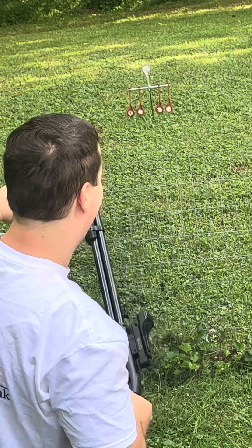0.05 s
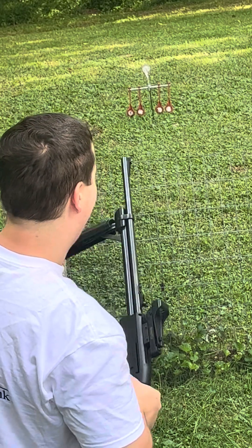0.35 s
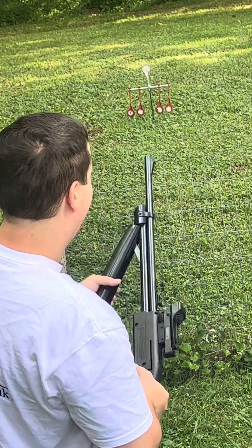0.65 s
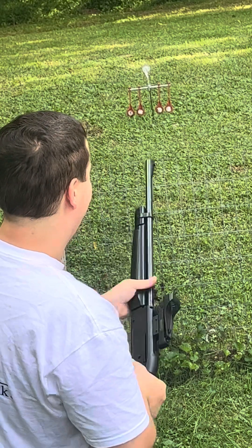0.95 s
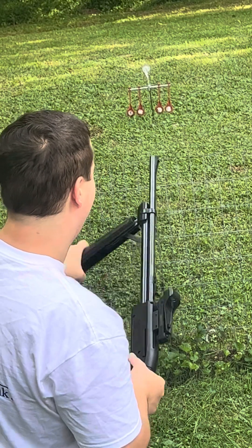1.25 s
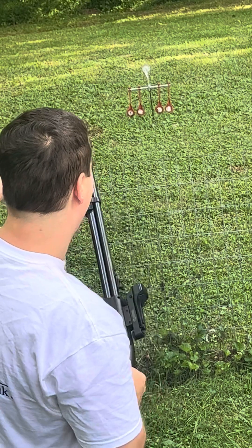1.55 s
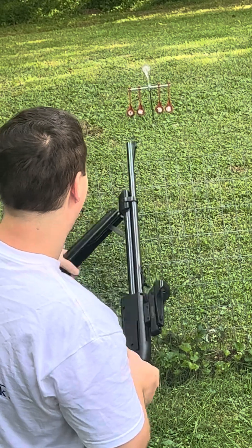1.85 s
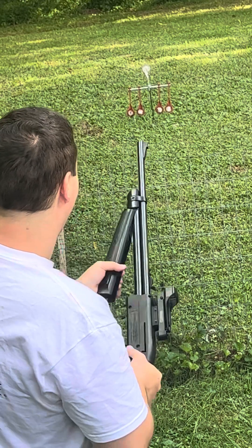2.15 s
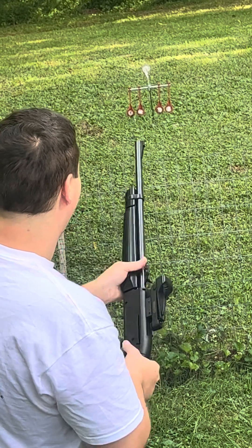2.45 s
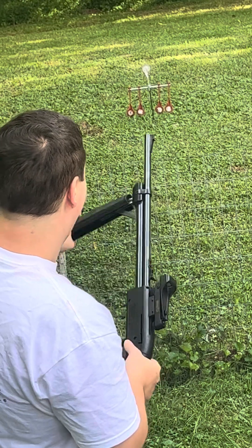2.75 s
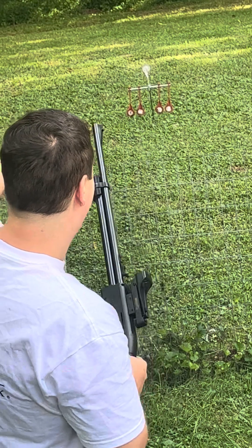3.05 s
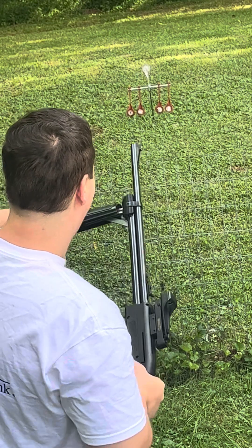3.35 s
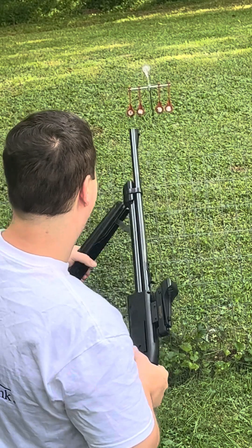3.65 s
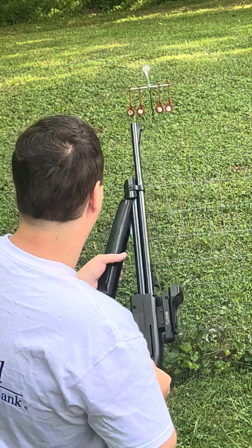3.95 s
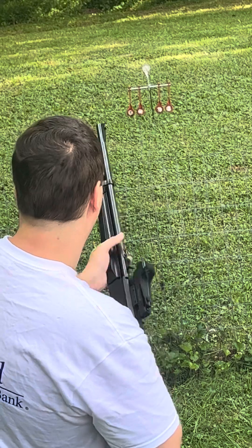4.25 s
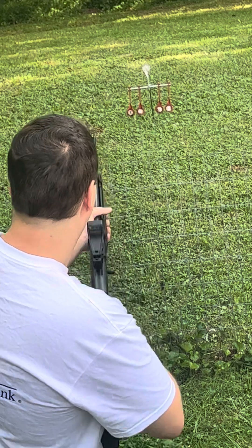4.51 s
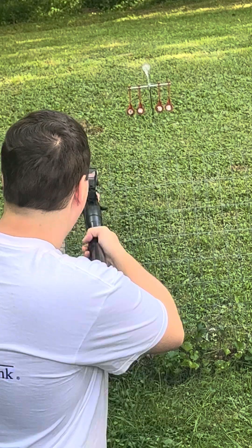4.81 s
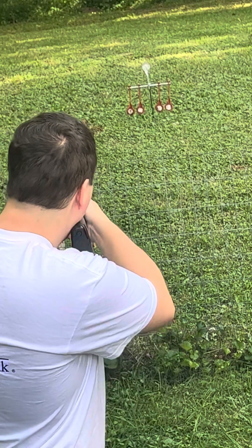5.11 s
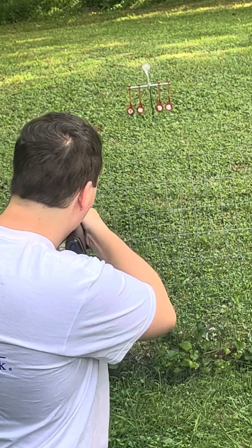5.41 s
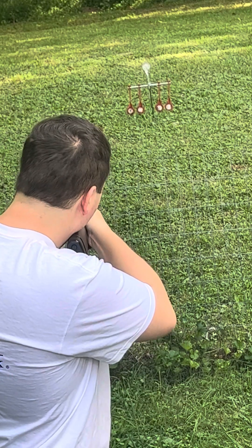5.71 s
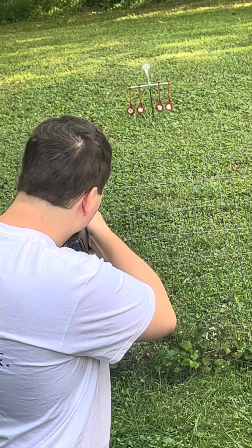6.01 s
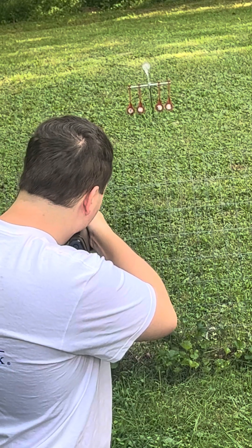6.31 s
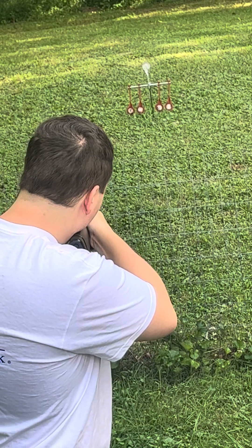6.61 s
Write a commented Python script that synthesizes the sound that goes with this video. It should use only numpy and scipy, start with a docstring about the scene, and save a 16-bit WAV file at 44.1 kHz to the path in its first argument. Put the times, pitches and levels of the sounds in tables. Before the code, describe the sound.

Three loud clacks of an air rifle's pump lever closing, with softer clicks between, on a quiet lawn with insects.

```python
"""On a summer lawn, an arm's length from a hand-held phone, a multi-pump air rifle is pumped three times.
The lever clicks open, the piston slides and draws air, and the fore-end slaps shut, ringing the tube.
A near wall and far trees answer; insects and two crickets sing over distant traffic and a machine.
Right at the microphone a breeze buffets, a sleeve rustles and the hand bumps softly."""
import sys
import numpy as np
from scipy import signal
from scipy.fft import rfft, irfft, next_fast_len
from scipy.io import wavfile
from scipy.ndimage import uniform_filter1d

SR = 44100
rng = np.random.default_rng(int(sys.argv[2]) if len(sys.argv) > 2 else 0)


def bounce(signal):
    """Save signal as a 16-bit WAV file at the path given by the first command-line argument."""
    frames = np.transpose(np.atleast_2d(signal))
    limited = np.clip(frames, -1, 1)
    pcm = np.round(limited * 32767).astype(np.int16)
    wavfile.write(sys.argv[1], SR, pcm)


N = 298556
T = np.arange(N) / SR

# far background: (time [s], air [dB], lower insects [dB], upper insects and whine [dB])
GARDEN_LEVELS = [(0, -56.5, -55.5, -59.5), (1.5, -54.5, -56, -58.5), (3, -57, -55.5, -59),
                 (4.6, -59, -57, -58), (5.4, -60, -60, -58.5), (6.77, -60, -63.5, -60)]
# far air and traffic: (frequency [Hz], level [dB])
FAR_AIR_SPECTRUM = [(30, -48), (70, -22.5), (120, 6), (400, -2), (700, 0), (1200, -3.5), (2500, -14),
                    (5000, -20), (9000, -39.5), (10500, -26.5), (14200, -28.5), (16000, -34)]
# a distant machine: (frequency [Hz], level [dB])
HUM_TONES = [(118, -75.5), (240, -65.5), (1060, -79), (1290, -71.5)]
# insect choruses and, last, a thin whine: (centre [Hz], width [Hz], relative level [dB])
HIGH_BANDS = [(3700, 740, -11), (4490, 480, -13), (5720, 1770, -4.5), (6560, 700, -5.5), (7220, 860, -4.5),
              (9040, 240, -15)]
# a faint, thin 9 kHz whine fades in, grows and cuts off near the end: (time [s], gain [dB])
WHINE_SWELL = [(0, -36), (1.1, -11), (1.7, 0.5), (4.3, 1.5), (4.7, 5), (6.37, 7.5), (6.55, -21)]
# two crickets: (time [s], lower pitch [Hz], upper pitch [Hz], lower level [dB], upper level [dB])
CRICKET_SONGS = [(0, 3820, 4230, -79, -75), (4.3, 3684, 4200, -78, -75), (4.65, 3690, 4145, -83, -70.5),
                 (5.05, 3600, 4240, -88, -71.5), (5.25, 3620, 4240, -74, -75), (5.5, 3780, 4240, -78, -78),
                 (6.1, 3830, 4200, -80, -82), (6.77, 3770, 4180, -97.5, -84.5)]
# the breeze drops halfway and returns at the end: (time [s], relative level [dB])
BREEZE_LEVELS = [(0.0, -67), (0.14, -52.5), (0.87, -51), (0.95, -58), (1.0, -43), (1.27, -54),
                 (2.15, -50.5), (2.17, -46), (2.93, -48.5), (3.1, -53), (3.35, -70), (3.96, -85),
                 (4.35, -65), (4.75, -61), (5.21, -83), (5.97, -75), (6.53, -51), (6.77, -55)]
# wind on the microphone: (frequency [Hz], level [dB])
WIND_SPECTRUM = [(20, -31.5), (40, -11), (65, 0), (120, 2.5), (200, -6), (300, -22.5), (700, -69)]
# sleeve and grip, close up: (time [s], level [dB])
RUSTLE_LEVELS = [(0, -59.5), (.3, -53.5), (2.45, -60), (2.94, -53), (3.24, -56.5), (4.4, -55.5),
                 (4.58, -54.5), (4.73, -56.5), (4.97, -62.5), (6.77, -58.5)]
# rubbing cloth: (frequency [Hz], level [dB])
CLOTH_SPECTRUM = [(30, -58), (75, -25), (130, -4.5), (230, 1.5), (330, -8.5), (520, -6), (900, -22.5),
                  (3000, -42)]
# barrel, pump tube and plastic fore-end: (frequency [Hz], level [dB], t60 [s])
RIFLE_MODES = [(373.5, -11, 0.061), (480, -14, .04), (681, -3, 0.046), (960, -4.5, 0.054),
               (1051, -8.5, 0.073), (1363, -1.5, 0.083), (1479, -12, 0.11), (1819, 0, 0.037),
               (2110, -4.5, 0.032), (2467, -2, 0.025), (2996, -1.5, 0.025), (3260, 0, 0.025),
               (3644, 1.5, 0.028), (4450, -10, 0.019), (5150, -1, 0.033), (6740, -11, 0.025),
               (10920, -2, 0.021)]
# the crack of contact: (frequency [Hz], level [dB])
CRACK_SPECTRUM = [(200, -10.5), (480, -4.5), (820, -9), (2000, -1.5), (3100, 3), (4100, -0.5), (5200, 3),
                  (6000, -5), (7500, -5.5), (9000, -1.5), (11500, 0.5), (14500, -1.5), (16000, -4)]
# the rifle's crowded higher modes: (frequency [Hz], level [dB])
CROWD_SPECTRUM = [(150, -11.5), (500, -15), (780, -15), (1050, -6), (1700, 1), (2300, -4), (3700, -13.5),
                  (5200, -11.5), (6500, -12), (12000, -12), (16000, -34.5)]
# the linkage knocks against its open stop: (time [s], level [dB])
STOP_KNOCKS = [(0.055, -58), (1.5405, -45.5), (2.9661, -45.5), (3.174, -53)]
# small linkage ticks, and the latch's low thump just before the third slap:
# (time [s], level [dB], low edge [Hz], high edge [Hz])
TICKS_AND_THUMP = [(.209, -58.5, 4000, 14800), (0.346, -50, 1500, 4000), (0.381, -43.5, 1610, 4080),
                   (.388, -46, 1595, 3970), (0.657, -48.5, 1740, 12700), (1.1084, -41, 1200, 4000),
                   (1.114, -34.5, 1400, 6460), (1.756, -59, 1510, 3960), (1.787, -47, 1500, 4040),
                   (2.157, -49.5, 2500, 14100), (2.9754, -44.5, 1600, 3760), (3.1912, -46, 1530, 4070),
                   (3.4983, -43, 1600, 14900), (3.515, -47, 1600, 5000), (3.5305, -44, 1480, 5000),
                   (4.0689, -26.5, 300, 1720)]
# the fore-end slaps shut:
# (time [s], level [dB], latch lead [s], tube note [Hz], relative latch [dB], relative crack [dB])
SLAPS = [(0.775, -11, 0.0077, 5130, -13, 2.5), (2.237, -10.5, 0.0077, 5150, -10.5, 3),
         (4.0776, -10, 0.0095, 4870, -19, 1)]
# the lever snaps out of its catch: (time [s], level [dB], catch lead [s], lever note [Hz])
LEVER_SNAPS = [(1.0416, -26, .0416, 1670), (2.5304, -24.5, .0336, 1765)]
# the piston is pushed back down its tube: (middle [s], level [dB])
PISTON_PUSHES = [(.365, -53), (1.789, -50.5), (3.539, -50.5)]
# the sliding piston: (frequency [Hz], level [dB])
SLIDE_SPECTRUM = [(300, -16.5), (650, -0.5), (1100, -7.5), (1750, -4), (2700, -4.5), (3700, -4),
                  (5500, -10.5), (8500, -14), (14000, -16), (16000, -33.5)]
# near wall and lawn edge: (delay [s], level [dB], t60 [s], tilt [dB/octave])
NEAR_ECHOES = [(0.0219, -17.5, .05, -3), (0.096, -39.5, .15, -6.5)]
# scatter from lawn and trees: (low edge [Hz], requested high edge [Hz], level [dB], t60 [s])
TREE_SCATTER = [(913, 1400, -16.5, 0.2), (301, 240, -21, 0.235), (1000, 1760, -20.5, 1),
                (2200, 5300, -22, .7), (3010, 8300, -23, 1), (10000, 12200, -23, 0.38)]
# a rush of pump air, then two faint rubs: (middle [s], level [dB], low edge [Hz], high edge [Hz])
SOFT_RASPS = [(.745, -48.5, 1140, 2100), (4.997, -58.5, 2880, 4000), (5.32, -62, 3700, 4730)]
# the valve's whistle: (pitch [ratio], level [dB])
WHISTLE_PARTIALS = [(0.999, -0.5), (1.748, -13.5), (2.45, -17.5), (6.298, -13.5)]
# the hand bumps the phone: (time [s], level [dB], pitch [Hz])
HAND_BUMPS = [(1.005, -35, 120), (1.179, -34, 122), (2.964, -26.5, 66), (2.981, -32, 94),
              (3.045, -28.5, 184), (3.161, -35, 199), (3.683, -32, 250), (4.345, -39, 240),
              (4.504, -35.5, 378), (4.54, -37, 259), (4.59, -40, 130), (4.632, -38.5, 256),
              (4.684, -38.5, 267), (4.752, -47, 226), (4.811, -27.5, 162), (4.856, -36.5, 238),
              (4.896, -38, 240), (4.925, -43, 228), (5.099, -37.5, 161), (5.132, -35, 148),
              (5.158, -33.5, 189), (5.556, -41.5, 140.3), (6.46, -34.5, 114)]
# sleeve and stock shift against the hand: (middle [s], half length [s], level [dB])
GRIP_SHIFTS = [(3.657, 0.23, -47.5), (4.55, .1, -44), (4.849, .1, -49.5), (5.198, 0.12, -51)]
# the two microphone ports: (frequency [Hz], left's phase lead [rad])
PORT_PHASE = [(20, 0), (350, -.15), (550, .4), (950, .6), (1250, 1.7), (1450, 2.9), (1580, 2.5),
              (1760, .35), (3000, .3), (5200, .05), (5700, -.75), (7100, -1.2), (8300, -3.1), (11000, -5.3),
              (15000, -9.3)]
# the close rifle at the ports: (frequency [Hz], left minus right [dB])
NEAR_BALANCE = [(250, -2.5), (600, 5), (800, 0), (1100, 9.5), (1380, -3.5), (1650, -10.5), (2100, -3),
                (3300, 0.5)]
# the far garden at the ports: (frequency [Hz], left minus right [dB])
FAR_BALANCE = [(600, 1), (900, 2), (1150, 0.5), (1450, -11), (1850, -7.5), (2300, -1), (3000, -0.5)]

# kinds of contact: (low edge [Hz], high edge [Hz], relative crack [dB], crack t60 [s])
CATCH = (990, 25000, 5, 0.007)
SNAP = (1360, 11400, 1.5, 0.017)
KNOCK = (1554, 4300, -2, -4.3)  # negative t60: the crack holds on as a short hiss
LATCH = (1200, 4600, 3.7, 0.01)
GRAZE = (4000, 30000, 5.8, 0.015)
REBOUND_S = 0.0099  # the linkage knocks a second time
SIDE = np.array([[1], [-1]])  # opposite signs left and right


def undb(db):
    """Decibels to gain."""
    return 10 ** (np.asarray(db) / 20)


def unit(x):
    """Scale to rms 1."""
    return x / np.sqrt(np.mean(x ** 2))


def unit_energy(x):
    """Scale to a sum of squares of 1."""
    return x / np.sqrt(np.sum(x ** 2))


def fade(t, t60):
    """Exponential decay that starts at t = 0."""
    return (t >= 0) * np.exp(-np.log(1000) * np.maximum(t, 0) / t60)


def swell(t, half_s):
    """Bell-shaped rise and fall around t = 0."""
    return np.exp(-.5 * (t / half_s) ** 2)


def bins(n):
    """Frequencies of a spectrum of n samples."""
    return np.maximum(np.fft.rfftfreq(n, 1 / SR), 1)


def along(points, hz):
    """Read (frequency [Hz], value) points on a log-frequency axis."""
    f, value = np.transpose(points)
    return np.interp(np.log(hz), np.log(f), value)


def curves(rows):
    """The columns of a time table, one value a sample."""
    s, *columns = np.transpose(rows)
    return [np.interp(T, s, c) for c in columns]


def bandpass(x, low_hz, high_hz):
    """Band-pass; the high edge is held between 1.2 times the low edge and 20 kHz."""
    edges = [low_hz, np.clip(high_hz, low_hz * 1.2, 20000)]
    return signal.sosfilt(signal.butter(2, edges, "band", fs=SR, output="sos"), x)


def colour(x, points, tilt_db=0):
    """Give x a spectrum, tilted per octave; rms 1."""
    n = next_fast_len(len(x))
    hz = bins(n)
    gain = undb(along(points, hz) + tilt_db * np.log2(hz))
    return unit(irfft(rfft(x, n) * gain, n)[:len(x)])


def noise(points, n=N):
    """Coloured noise of rms 1."""
    return colour(rng.standard_normal(n), points)


def wide(points, side_db):
    """Coloured noise that partly differs between left and right."""
    return unit(noise(points) + undb(side_db) * noise(points) * SIDE)


def walk(rate, n=N):
    """Random drift with a spread near 1, turning rate times a second."""
    k = int(SR / rate)
    steps = np.repeat(rng.standard_normal(n // k + 1), k)
    return np.sqrt(2) * uniform_filter1d(steps, k)[:n]


def sine(hz):
    """A sine that follows a moving pitch."""
    return np.sin(2 * np.pi * np.cumsum(hz) / SR)


def add(track, s, x):
    """Mix x into the track at time s."""
    i = max(int(s * SR), 0)
    track[i:i + len(x)] += x[:N - i]


def far_air_and_hum(drift_hz=1.504):
    """Far off, a wash of air and traffic and a machine whose hum drifts in pitch."""
    air = wide(FAR_AIR_SPECTRUM, side_db=-10.5) * undb(curves(GARDEN_LEVELS)[0] + 0.99 * walk(5))
    hum = sum(undb(db) * np.sqrt(2) * sine(hz + drift_hz * walk(5.4)) for hz, db in HUM_TONES)
    return air + hum


def insects_and_whine(throb_db=0.3, spacing_hz=35, uneven_db=4.5):
    """Choruses of narrow lines, each insect on its own pitch, and a faint, thin whine above them."""
    bands = 0
    _, lower_db, upper_db = curves(GARDEN_LEVELS)
    for k, (hz, width, db) in enumerate(HIGH_BANDS):
        band = [(hz / 2, -50), (hz - width, -12), (hz - width / 2, -3), (hz, 0),
                (hz + width / 2, -3), (hz + width, -16), (hz + 2 * width, -40), (hz * 2, -70)]
        level_db = lower_db if k < len(HIGH_BANDS) / 2 else upper_db
        whine_db = curves(WHINE_SWELL)[0] if k == len(HIGH_BANDS) - 1 else 0
        bands += wide(band, side_db=-15) * undb(db + level_db + whine_db + throb_db * walk(25))
    n = next_fast_len(N)
    lines = np.interp(bins(n) / spacing_hz, np.arange(SR // 20), rng.standard_normal(SR // 20))
    lined = irfft(rfft(bands, n) * undb(uneven_db * lines), n)[:, :N]
    return unit(lined) * np.sqrt(np.mean(bands ** 2))


def crickets(flutter_db=4, waver_hz=55, rate=420, chirp_s=5.095, chirp_hz=3520, glide_hz_per_s=-900):
    """Two single crickets with wavering, fluttering notes, and one far falling chirp."""
    low_hz, high_hz, low_db, high_db = curves(CRICKET_SONGS)
    songs = sum(undb(db + flutter_db * walk(rate)) * sine(hz + waver_hz * walk(rate))
                for hz, db in [(low_hz, low_db), (high_hz, high_db)])
    t = T - chirp_s
    chirp = undb(-73) * swell(t, 0.02) * np.sin(2 * np.pi * (chirp_hz + glide_hz_per_s * t / 2) * t)
    return np.sqrt(2) * (songs + chirp)


def breeze(gain_db=1.5, gust_db=2):
    """Eddies rumble right on the microphone."""
    eddies = wide(WIND_SPECTRUM, side_db=-11)
    return eddies * undb(curves(BREEZE_LEVELS)[0] + gain_db + gust_db * walk(20))


def sleeve_rustle(uneven_db=2):
    """Sleeve and grip rub softly and unevenly beside the microphone."""
    cloth = wide(CLOTH_SPECTRUM, side_db=-2.5) * undb(curves(RUSTLE_LEVELS)[0] + uneven_db * walk(35))
    return bandpass(cloth, 75, 4000)


def rifle_ring(t, detune=0.0067):
    """The rifle's modes; grip and point of contact detune them a little every time."""
    shifts = 1 + detune * rng.standard_normal(len(RIFLE_MODES))
    return unit_energy(sum((-1) ** k * undb(db) * np.sin(2 * np.pi * hz * shifts[k] * t) * fade(t, t60)
                           for k, (hz, db, t60) in enumerate(RIFLE_MODES)))


def contacts():
    """Every blow of the pumping cycle: (time [s], level [dB], *kind of contact)."""
    for s, db, lead, _ in LEVER_SNAPS:
        yield s - lead, db - 9, *CATCH
        yield s, db, *SNAP
    for s, db in STOP_KNOCKS:
        yield s, db, *KNOCK
        yield s + REBOUND_S, db + 4, *KNOCK
    for s, db, lead, _, latch_db, crack_db in SLAPS:
        yield s - lead, db + latch_db, *LATCH
        yield s - 0.003, db - 17, *GRAZE  # an edge grazes first
        yield s, db, 330, 12500, crack_db, 0.012  # the full slap
    for contact in TICKS_AND_THUMP:
        yield *contact, 2, 0.016  # all share one kind of crack


def blows(ring_db=0, crowd_db=-2, crowd_t60=0.051, span_s=0.0031):
    """Each contact cracks and rings the rifle; light catches leave the low modes at rest."""
    out, t = np.zeros(N), T[:SR // 8]
    for s, db, low_hz, high_hz, crack_db, crack_t60 in contacts():
        crack = undb(crack_db) * unit_energy(noise(CRACK_SPECTRUM, len(t)) * fade(t, crack_t60))
        crowd = undb(crowd_db) * unit_energy(noise(CROWD_SPECTRUM, len(t)) * fade(t, crowd_t60))
        hit = bandpass(undb(ring_db) * rifle_ring(t) + crack + crowd, low_hz, high_hz)
        add(out, s, undb(db) * np.sqrt(span_s * SR) * unit_energy(hit))  # energy of db held for span_s
    return out


def strokes(gritty_metal=0.1, smooth_air=0.9, metal_tilt_db=-1.44):
    """Every slide: (middle [s], level [dB], half length [s], tilt [dB/octave], even hiss [gain])."""
    for s, *_ in LEVER_SNAPS:  # the piston draws air
        yield s + 0.2, -59.5, 0.16, 0, smooth_air
    for s, db in STOP_KNOCKS:  # the linkage scrapes between its two knocks
        yield s + REBOUND_S / 2, db - 2, 0.01, metal_tilt_db, gritty_metal
    for s, db in PISTON_PUSHES:
        yield s, db, 0.044, metal_tilt_db, gritty_metal
    for s, db, *_ in SLAPS:  # the piston hisses under pressure just before the slap
        yield s - 0.021, db - 34.5, 0.011, 3, smooth_air


def piston_slides(grain_db=2.5, slips_per_s=700, ring_gain=0.4456):
    """The piston rubs along its tube in tiny slips that stir the rifle's modes."""
    out, t = np.zeros(N), np.arange(-SR // 5, SR // 5) / SR
    for s, db, half_s, tilt_db, hiss in strokes():
        slipping = rng.random(len(t)) < slips_per_s / SR
        slips = slipping * undb(grain_db * rng.exponential(size=len(t)))
        force = rng.standard_normal(len(t)) * (slips + hiss)
        ringing = signal.fftconvolve(force, rifle_ring(T[:SR // 16]))[:len(t)]
        rub = colour(force + ring_gain * ringing, SLIDE_SPECTRUM, tilt_db)
        stroke = undb(db) * rub * swell(t, half_s)
        add(out, s + t[0], stroke[s + t >= 0])
    return out


def garden_echo(x, side_db=-8, onset_s=0.012, build_s=0.012, uneven_db=2.1):
    """Wall and lawn edge throw back smeared slaps; grass and leaves scatter a tail that builds and dies."""
    t, heard = T[:SR], []
    build = 1 - np.exp(-np.maximum(t - onset_s, 0) / build_s)
    for _ in range(2):
        response = np.zeros(SR)
        for delay_s, db, t60, tilt_db in NEAR_ECHOES:
            smear = noise([(1200, 0), (9600, 3 * tilt_db)], SR)  # three octaves
            response += undb(db) * unit_energy(smear * fade(t - delay_s, t60))
        for low_hz, high_hz, db, t60 in TREE_SCATTER:
            scatter = rng.standard_normal(SR) * undb(uneven_db * walk(80, SR))
            tail = unit_energy(scatter * build * fade(t, t60))
            response += undb(db) * bandpass(tail, low_hz, high_hz)
        heard.append(signal.fftconvolve(x, response)[:N])
    mid, side = heard
    return mid + undb(side_db) * side * SIDE


def soft_rasps(half_s=0.0075):
    """Brief soft rasps: a rush of pump air before the first slap, two faint rubs later."""
    return sum(undb(db) * unit(bandpass(rng.standard_normal(N), low_hz, high_hz)) * swell(T - s, half_s)
               for s, db, low_hz, high_hz in SOFT_RASPS)


def valve_whistle(pitch_hz=1777, rise_hz_per_s=5500, waver_hz=65, flutter_db=3, relative_db=-25):
    """Air whistles through the valve, rising with the pressure and stopping as the latch touches."""
    out, t = np.zeros(N), np.arange(-SR // 8, SR // 40) / SR
    swell_s, release_s = 0.014, 0.0028
    envelope = np.exp(np.minimum(t / swell_s, -t / release_s))
    for s, db, lead, *_ in SLAPS:
        hz = pitch_hz + rise_hz_per_s * t + waver_hz * walk(400, len(t))
        whistle = sum(undb(partial_db + flutter_db * walk(300, len(t))) * sine(ratio * hz)
                      for ratio, partial_db in WHISTLE_PARTIALS)
        add(out, s - lead + t[0], undb(db + relative_db) * whistle * envelope)
    return out


def struck_notes(lever_gain=0.706, lever_t60=0.044, tube_gain=0.5, tube_t60=0.019):
    """The part that takes the blow sounds its own short note: the lever in a snap, the tube in a slap."""
    out, t = np.zeros(N), T[:SR // 8]
    for rows, gain, t60 in ((LEVER_SNAPS, lever_gain, lever_t60), (SLAPS, tube_gain, tube_t60)):
        for s, db, _, hz, *_ in rows:
            add(out, s, gain * undb(db) * np.sin(2 * np.pi * hz * t) * fade(t, t60))
    return out


def thud(hz, rise_cycles=0.53):
    """A few heavily damped swings."""
    t = T[:SR // 8]
    age = t * hz / rise_cycles
    return np.sin(2 * np.pi * hz * t) * age ** 2 * np.exp(2 * (1 - age))


def handling_bumps(jolt_db=-23.5, jolt_hz=198.4, low_hz=190, high_hz=420, scatter_db=3, per_shift=14):
    """Thuds in the phone's body: the hand's bumps, each slap's jolt, and flurries as the grip shifts."""
    out = np.zeros(N)
    for s, db, hz in HAND_BUMPS:
        add(out, s, undb(db) * thud(hz))
    for s, db, *_ in SLAPS:
        add(out, s, undb(db + jolt_db) * thud(jolt_hz))
    for s, half_s, db in GRIP_SHIFTS:
        for when, pitch, size in rng.uniform(-1, 1, (per_shift, 3)):
            hz = low_hz * (high_hz / low_hz) ** ((pitch + 1) / 2)
            add(out, s + half_s * when, undb(db + scatter_db * size) * thud(hz, rise_cycles=1))
    return bandpass(bandpass(out, 62, 1700), 54, 3000)


def body_shade(x, balance):
    """The phone's body favours one microphone port or the other."""
    n = next_fast_len(N + SR // 10)
    gains = undb(along(balance, bins(n)) * SIDE / 2)
    return irfft(rfft(x, n) * gains, n)[:, :N]


def microphone_ports(pair):
    """The phone's stereo widening shifts the right channel's phase by an amount that depends on frequency, with
    a sharp step near 1.6 kHz."""
    left, right = pair
    n = next_fast_len(N + SR // 10)
    lag = np.exp(-1j * along(PORT_PHASE, bins(n)))
    return np.array([left, irfft(rfft(right, n) * lag, n)[:N]])


def scene(outward_db=1):
    """The rifle at arm's length, the garden beyond it, and wind and handling on the microphone."""
    rasping = piston_slides() + soft_rasps()
    rifle = blows() + struck_notes() + valve_whistle() + rasping
    # the rifle radiates differently outward, so its echoes blur the modes and lack the single notes
    outward = undb(outward_db) * blows(ring_db=-5, crowd_db=1, crowd_t60=0.048) + rasping
    garden = garden_echo(outward) + insects_and_whine() + crickets() + far_air_and_hum()
    airborne = body_shade(rifle, NEAR_BALANCE) + body_shade(garden, FAR_BALANCE)
    return microphone_ports(airborne) + breeze() + sleeve_rustle() + handling_bumps()


def record(dry):
    """The phone thins the rumble below 36 Hz, rounds the loudest peaks and cuts the top at 15.8 kHz."""
    thinned = signal.sosfilt(signal.butter(3, 36, "high", fs=SR, output="sos"), dry)
    rounded = np.tanh(0.94 * thinned) / 0.88
    return signal.sosfilt(signal.ellip(8, .2, 70, 15800, fs=SR, output="sos"), rounded)


dry = scene()
out = record(dry)
bounce(out)
```